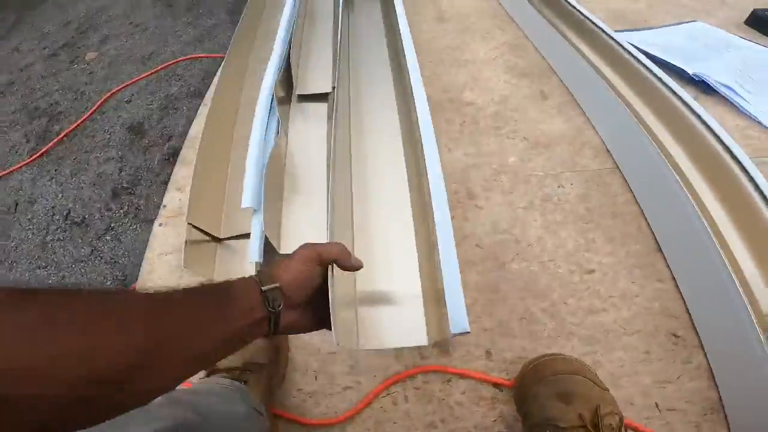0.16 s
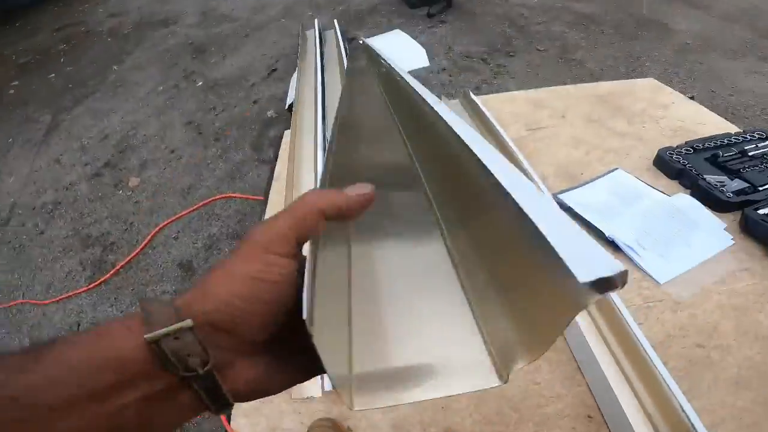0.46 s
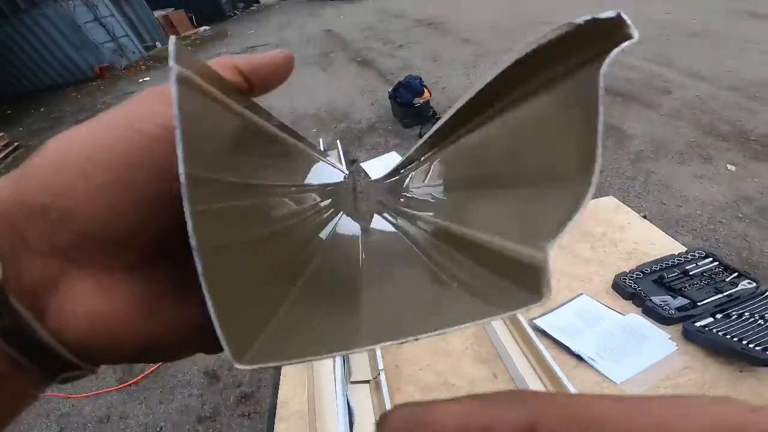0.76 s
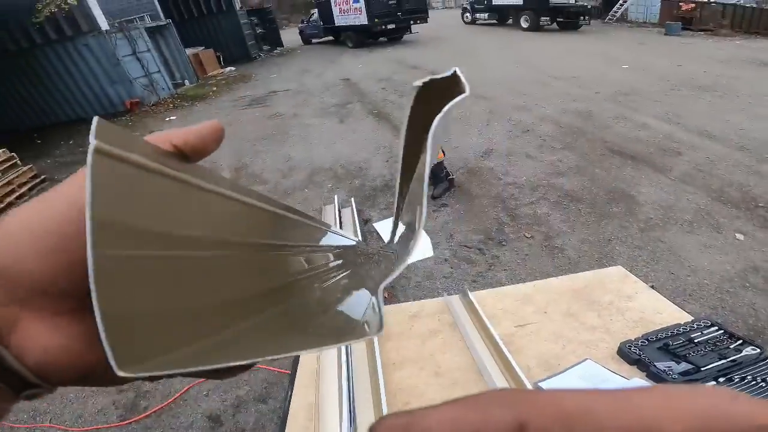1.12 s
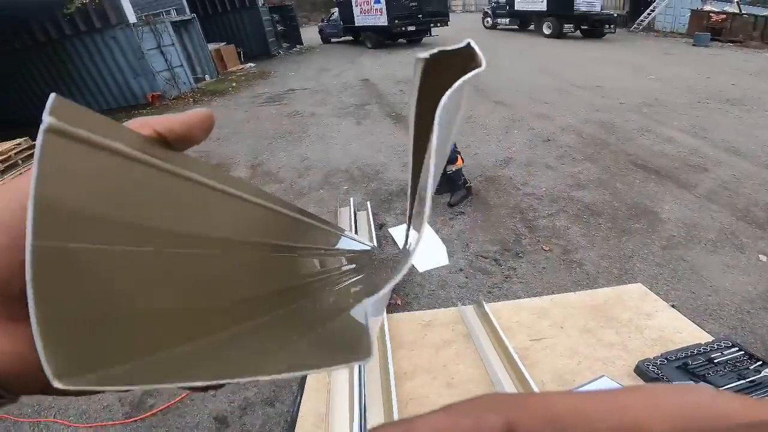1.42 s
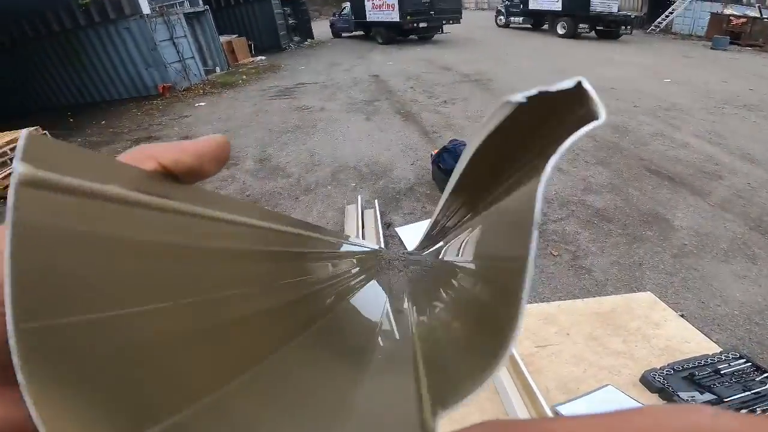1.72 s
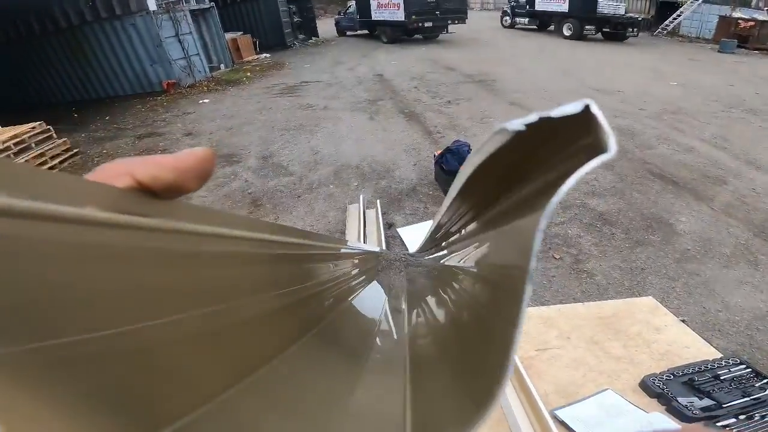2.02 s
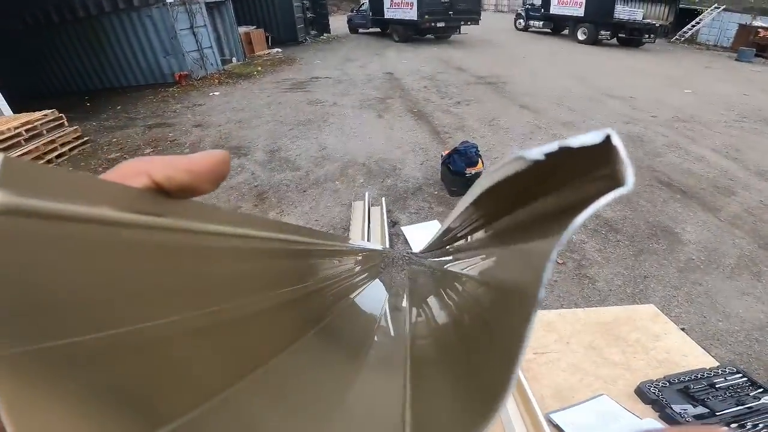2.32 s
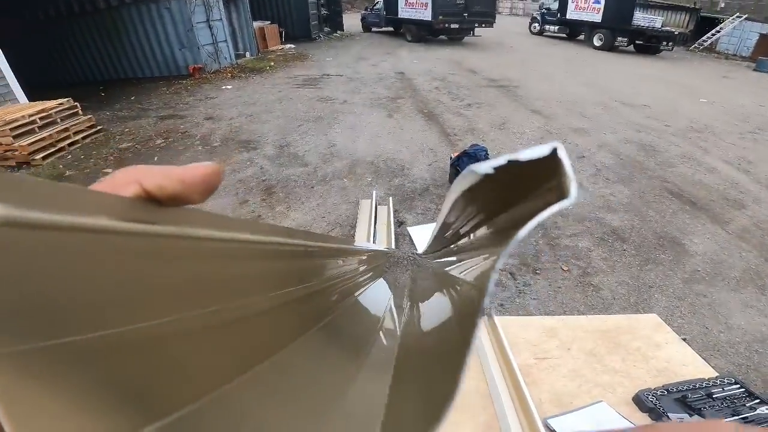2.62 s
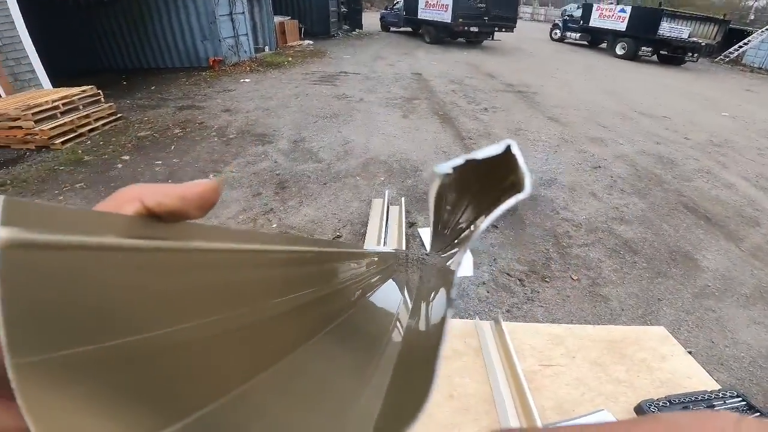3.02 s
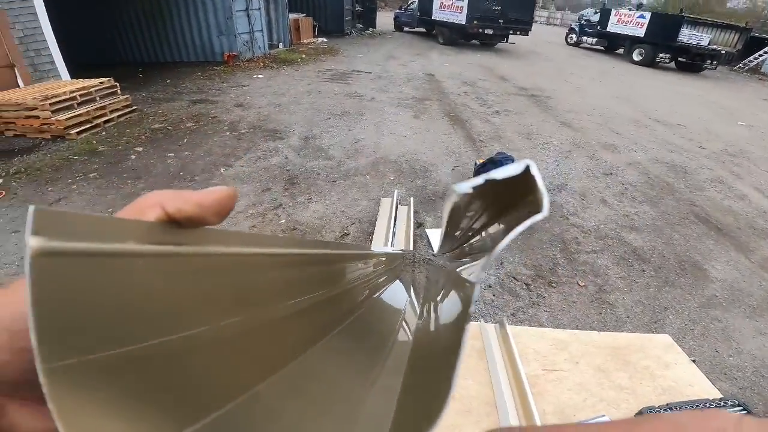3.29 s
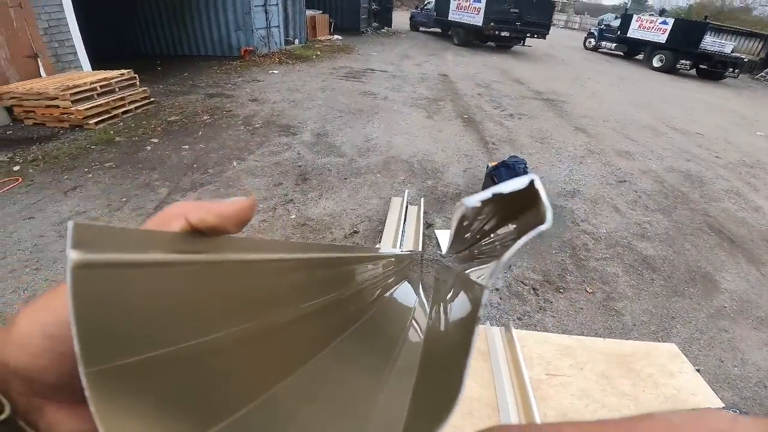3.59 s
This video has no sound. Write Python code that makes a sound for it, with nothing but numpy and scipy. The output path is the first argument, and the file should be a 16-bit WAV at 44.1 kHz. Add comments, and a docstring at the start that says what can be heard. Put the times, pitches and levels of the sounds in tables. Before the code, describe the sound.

A thin sheet-metal gutter gives dull knocks at about 0.1 s, then knocks, scrapes and squeals briefly off a board from 0.3 to 0.55 s. At 0.6-1.1 s it booms and rattles with fine metallic rasping and a cluster of sharp, pinging ticks. Fainter scattered clicks and tiny creaks continue, clearer near 1.6, 3.0, 3.2 and 3.6 s, with a soft knock at 3.5 s. Close, dry outdoor pickup; lumpy low wind, strongest early, over faint yard wash.

```python
"""Under a rumble of wind, dull knocks sound as a length of thin sheet-metal gutter bumps wood or hand.
Its edge scrapes and squeals off a plywood board by stick-slip, and its panels rattle and boom as it lifts.
Then it ticks as it flexes in the hand: dispersion turns each snap into a falling chirp, and the lip pings.
Random slips and blows drive the metal's responses; the wind and the faint open yard are coloured noise."""
import sys
import numpy as np
from scipy import signal
from scipy.fft import rfft, irfft, next_fast_len
from scipy.io import wavfile

SR = 44100
rng = np.random.default_rng(int(sys.argv[2]) if len(sys.argv) > 2 else 0)


def wav_out(sig):
    """Save sig, one row per channel (or a flat mono array), as 16-bit PCM at SR to the path in sys.argv[1]."""
    wavfile.write(sys.argv[1], SR, np.round(np.clip(np.atleast_2d(sig).T, -1, 1) * 32767).astype(np.int16))


N = 165375
T = np.arange(N) / SR
RING_T = T[:SR]   # one second, the length of every response

# The lip's resonance rises as it leaves the board. Each row: time in seconds, pitch in Hz.
LIP_PITCH = [(.28, 3880), (.5, 4020), (.64, 4210)]


def from_db(db):
    """Decibels to amplitude gain, by the logarithmic definition of level."""
    return 10 ** (np.asarray(db) / 20)


def rms_one(x):
    """Normalise to unit root-mean-square amplitude."""
    return x / np.sqrt(np.mean(x ** 2) + 1e-20)


def unit_energy(x):
    """Normalise an impulse response to unit energy."""
    return rms_one(x) / np.sqrt(x.shape[-1])


def decay(t60):
    """Exponential decay: the level falls by 60 dB in t60 seconds."""
    return np.exp(-np.log(1000) * RING_T / t60)


def level(rows, outside=None):
    """Envelope interpolated linearly in decibels between (s, dB) rows."""
    s, db = np.transpose(rows)
    return from_db(np.interp(T, s, db, left=outside, right=outside))


def colour(x, points):
    """Minimum-phase filtering: the (Hz, dB) shape fixes the phase through the Hilbert transform."""
    size = next_fast_len(x.shape[-1] + SR // 8)
    hz, db = np.transpose(points)
    f = np.maximum(np.abs(np.fft.fftfreq(size, 1 / SR)), 1)
    log_gain = np.log(from_db(np.interp(np.log(f), np.log(hz), db)))
    response = np.exp(np.conj(signal.hilbert(log_gain)))[:size // 2 + 1]
    return irfft(rfft(x, size) * response, size)[..., :x.shape[-1]]


def stereo_noise(size, side_db):
    """Partly correlated white noise: a shared mid signal and an opposed side signal."""
    mid, side = rng.standard_normal((2, size))
    return mid + from_db(side_db) * side * np.array([[1], [-1]])


def drift(rate):
    """Slow random wander of unit rms, with `rate` random knots per second."""
    knots = rng.standard_normal(N // 100)
    return rms_one(np.interp(T * rate, np.arange(len(knots)), knots))


def play(force, response):
    """Linear superposition: a force convolved with a body's impulse response."""
    return signal.fftconvolve(np.atleast_2d(force), response, axes=-1)[:, :N]


def blows(s, db):
    """Impulsive excitation: one single-sample force for each blow."""
    return np.bincount((np.asarray(s) * SR).astype(int), from_db(db), N)[:N]


def slips(per_s, spread_db):
    """Stick-slip friction: randomly timed impulses of uneven size and either sign."""
    excess_db = spread_db * np.minimum(rng.exponential(1, N), 4)
    sizes = from_db(excess_db) * rng.choice([-1, 1], N)
    return sizes * (rng.random(N) < per_s / SR)


def chirps(paths):
    """Dispersion of bending waves: the treble travels faster than the bass."""
    top_hz = 16000
    f = np.fft.rfftfreq(SR, 1 / SR)
    out = 0
    for delay, lag, db in paths:
        # the derivative of this phase is an arrival time that varies as 1 / sqrt(f)
        cycles = f * (abs(delay) + 1 / 2 ** 11) + lag * (2 * np.sqrt(f * top_hz) - f)
        out = out + from_db(db) * np.exp(-2j * np.pi * cycles)
    band_limited = out * np.exp(-(f / top_hz) ** 20)
    return unit_energy(irfft(band_limited, SR) * np.exp(-10 * RING_T))


def dense_ring(t60, side_db):
    """High modal density: modes merge into noise whose bands die sooner toward the treble."""
    tail_slope = 0.48   # t60 holds at 4 kHz and varies as frequency to the minus this power
    edges = np.geomspace(60, 20000, 13)
    noise = rfft(stereo_noise(SR, side_db))
    f = np.fft.rfftfreq(SR, 1 / SR)
    out = 0
    for low, high in zip(edges, edges[1:]):
        life = t60 * (4000 / np.sqrt(low * high)) ** tail_slope
        band = irfft(noise * ((f >= low) & (f < high)), SR)
        out = out + band * decay(life) / np.sqrt(life)
    return unit_energy(out)


def sheet_ring():
    """Modal superposition: long modes among faint ones, each a little louder on one side."""
    # Long ringing modes of the free sheet.
    # Each row: frequency in Hz, relative level in dB before scatter, t60 in seconds.
    sheet_modes = [(308, -8, .3), (436, -11, .45), (578, -9, .6), (868, -13, .5), (906, -11.5, 1.5),
                   (958, -14, .9), (1066, -14, .7), (1200, -1, .22), (1343, -14, .35), (1750, -9, .3),
                   (1820, -14, .4), (2056, -15, .6), (2960, -8, .25)]
    faint = [(hz, -19, .55) for hz in rng.uniform(450, 3200, size=40)]
    out = 0
    for hz, db, t60 in [*sheet_modes, *faint]:
        gain = from_db(db + rng.normal(0, 1, (2, 1))) * rng.choice([-1, 1])
        out = out + gain * np.sin(2 * np.pi * hz * RING_T) * decay(t60)
    return unit_energy(out)


def gutter(shape, tail_db, modes_db, side_db, t60, grip_t60=np.inf, paths=None):
    """Impulse response at one contact: dispersed chirps, dense ringing and long modes."""
    # Bending waves arrive by several paths.
    # Each row: delay in seconds, lag of 4 kHz behind the top in seconds, relative level in dB.
    sheet_paths = [(0, .003, -6), (0, .008, 0)]
    chirp = chirps(sheet_paths if paths is None else paths)
    body = colour(chirp + from_db(tail_db) * dense_ring(t60, side_db), shape)
    modes = unit_energy(sheet_ring() * decay(grip_t60))
    return unit_energy(body) + from_db(modes_db) * modes


def ticks():
    """Snap excitation: each snap stirs sheet and lip, some the lower body more than others."""
    # Sharp ticks. Each row: ping time in seconds, relative snap drive in dB,
    # relative ping level in dB, drive of the body against the snap in dB.
    tick_rows = [(0.6204, -11.5, -17.5, 9), (0.6828, -23, -17.5, 25.5), (0.696, -45, -20.5, 6),
                 (0.717, -13.5, -21, 18), (0.7563, -33.5, -18, -14), (0.7821, -12, -17.5, 14.5),
                 (0.8027, -22, -19.5, 8), (0.825, -11, -28.5, 8.5), (0.8942, -41, -17, -2),
                 (0.961, -15.5, -16, 8), (1.01, -21.5, -20.5, 8), (1.0851, -24, -27, 15),
                 (1.2379, -17.5, -22.5, 3.5), (1.4732, -36.5, -39, 11), (1.5726, -33, -39, 4),
                 (1.6101, -22, -27, 5), (1.749, -37.5, -50, 14), (1.7685, -30, -28, 17),
                 (2.1313, -31.5, -38.5, 2), (2.174, -35, -42, 9.5), (2.264, -45, -51, 18.5),
                 (2.367, -41, -46.5, 18), (3.017, -24.5, -28.5, 11.5), (3.1713, -24, -27.5, 12),
                 (3.6065, -25.5, -35, 14.5)]
    # Spectrum of the snapping sheet. Each row: frequency in Hz, relative level in dB.
    tick_colour = [(200, -12.5), (600, -20.5), (1700, -6), (2450, -11), (3000, -1.5), (4400, -5),
                   (5200, -0.5), (7000, 1), (8200, -6.5), (9700, -3.5), (11500, -14), (15500, -25)]
    lead_s, body_edge_hz = .0015, 2610   # the blow precedes its ping; the body lies below the edge
    s, snap_db, ping_db, body_db = np.transpose(tick_rows)
    # the hand damps the long modes
    response = gutter(tick_colour, tail_db=-2.5, modes_db=-12, side_db=-5, t60=0.29, grip_t60=1)
    lowpass = signal.butter(3, body_edge_hz, fs=SR, output="sos")
    body = signal.sosfiltfilt(lowpass, response, padtype=None)
    upper_snaps = play(blows(s - lead_s, snap_db), response - body)
    body_snaps = play(blows(s - lead_s, snap_db + body_db), body)
    pings = sum(from_db(db) * ping(at) for at, db in zip(s, ping_db))
    return from_db(15) * (upper_snaps + body_snaps) + from_db([[6], [4]]) * pings


def ping(s):
    """Beating of close modes: the lip sings briefly, then a weak reflection and a fluttering tail."""
    # Close modes of the folded lip. Each row: frequency in Hz before scatter, relative level in dB.
    lip_modes = [(3835, -16), (4185, -2.5), (4410, -8)]
    attack_s, burst_s = 0.00051, 0.0088
    echo_s, echo_db = .0185 * rng.uniform(1, 1.6), -12.5
    tail_db, tail_t60_s, flutter_per_s = -10.5, 0.26, 170
    bend = 1 + 0.01214 * rng.standard_normal()   # the pitch scatters from tick to tick

    def burst(t):
        """Quick exponential onset under a flat-topped window."""
        t = np.maximum(t, 0)
        return (1 - np.exp(-t / attack_s)) * np.exp(-(t / burst_s) ** 4)

    tail = from_db(tail_db) * decay(tail_t60_s)
    onset = burst(RING_T) + from_db(echo_db) * burst(RING_T - echo_s)
    out = 0
    for hz, db in lip_modes:
        flutter = np.array([drift(flutter_per_s)[:SR] for side in "LR"])
        tone = np.sin(2 * np.pi * hz * bend * RING_T)
        out = out + from_db(db) * (onset + tail * flutter) * tone
    return np.pad(out, ((0, 0), (int(s * SR), N)))[:, :N]


def knocks():
    """Impact spectrum: a softer contact with wood or hand lasts longer and is duller."""
    # Dull knocks. Each row: time in seconds, relative drive in dB, upper edge in Hz.
    knock_rows = [(.104, -16.5, 9000), (0.125, -16.5, 3520), (.331, -13.5, 2500), (0.444, -10.5, 4020),
                  (3.517, -19, 680)]
    # Spectrum of the knocked gutter. Each row: frequency in Hz, relative level in dB.
    knock_colour = [(80, -21.5), (270, 2), (1200, 2.5), (2250, -9), (7000, -18), (15000, -67.5)]
    force = 0
    for s, db, edge_hz in knock_rows:
        softness = signal.butter(1, edge_hz, fs=SR, output="sos")
        force = force + signal.sosfilt(softness, blows([s], [db]) + 1e-18)
    response = gutter(knock_colour, tail_db=7, modes_db=-6, side_db=-11, t60=0.1,
                      paths=[(0, .001, 0)])
    return from_db(21.5) * play(force, response)


def slide(force, contact, count=6):
    """Position-dependent excitation: the contact hops between places, each with its own ring."""
    shifts_per_s = 35   # knots per second in the wander that chooses the place
    place = np.argmax([drift(shifts_per_s) for k in range(count)], axis=0)
    return sum(play(force * (place == k), unit_energy(contact())) for k in range(count))


def drag():
    """Stick-slip friction: the edge stutters over the board."""
    # Pressure of the edge on wood. Each row: time in seconds, relative drive in dB.
    pressure = [(.125, -17.5), (.17, -30.5), (.25, -37), (.29, -19.5), (.345, -18), (.39, -19.5),
                (.455, -21), (.53, -20.5), (.73, -25.5), (.85, -24), (.99, -28), (1.15, -45)]
    # Spectrum of the scrape. Each row: frequency in Hz, relative level in dB.
    drag_colour = [(120, -22.5), (290, 2.5), (380, -8), (580, 1.5), (1020, -5.5), (1190, 7.5),
                   (1450, -10.5), (1750, 1), (2250, -18), (2750, -10), (4700, -17.5), (15000, -53.5)]
    contact = lambda: gutter(drag_colour, tail_db=-1, modes_db=-5.5, side_db=-10, t60=0.091)
    force = rms_one(slips(per_s=2000, spread_db=3) * from_db(2.2 * drift(80)))
    return from_db(-0.5) * slide(force * level(pressure, -120), contact)


def lip(x):
    """Time-varying resonance: shifting down, smoothing and shifting back follows the lip's pitch."""
    width_hz, peak_db = 300, 20
    turn = np.exp(2j * np.pi * np.cumsum(np.interp(T, *np.transpose(LIP_PITCH))) / SR)
    r = np.exp(-np.pi * width_hz / SR)
    smoothed = signal.lfilter([1 - r], [1, -r], x / turn + 1e-18)
    return x + from_db(peak_db) * 2 * np.real(turn * smoothed)


def rasp():
    """Friction of metal on metal: fine slips grate during the lift and creak in the grip."""
    # Fine rasp. Each row: time in seconds, relative drive in dB.
    rasp_rows = [(.11, -50), (.21, -54), (.265, -41), (.3, -36), (.375, -39), (.415, -32.5), (.48, -39),
                 (.54, -34.5), (.61, -44), (.635, -32.5), (.82, -35), (.885, -39), (.975, -35),
                 (1.06, -52.5), (1.2, -61)]
    # Creaks and rustles in the grip, from brief to drawn out.
    # Each row: centre in seconds, half-width to 1/e in seconds, relative drive in dB.
    creak_rows = [(.01, 0.16, -61), (1.76, 0.023, -44), (1.387, 0.59, -65), (2.394, 0.2, -64.5),
                  (2.683, 0.022, -51), (2.984, 0.18, -64.5), (3.547, 0.04, -55.5)]
    # Spectrum of the rasp. Each row: frequency in Hz, relative level in dB.
    rasp_colour = [(1500, -38), (2800, 1), (5000, -0.5), (7000, 4.5), (8200, -0.5), (9500, -1),
                   (12000, -8.5), (15500, -36)]
    contact = lambda: gutter(rasp_colour, tail_db=3, modes_db=-30, side_db=-9, t60=.07)
    grip = sum(from_db(db) * np.exp(-((T - s) / length) ** 2) for s, length, db in creak_rows)
    uneven_slips = slips(per_s=1500, spread_db=4) * from_db(2.5 * drift(80))
    grating = rms_one(uneven_slips) * level(rasp_rows, -120)
    creaking = rms_one(slips(per_s=310, spread_db=5)) * grip
    return slide(lip(from_db(2.0) * grating + from_db(-2) * creaking), contact)


def sing(hz, waver_hz):
    """Self-sustained resonance under uneven slips: pitch and strength waver."""
    tone = np.sin(2 * np.pi * np.cumsum(hz + waver_hz * drift(200)) / SR)
    return rms_one(tone * from_db(2 * drift(200)))


def squeals():
    """Friction-driven oscillation: the lip squeals on each skid, higher as it leaves the board."""
    # Skids of the edge. Each row: centre in seconds, level in dB.
    skids = [(0.291, -25.5), (.342, -23.5), (0.411, -27), (0.451, -26), (0.501, -24), (.535, -26)]
    skid_s, waver_hz = 0.016, 91.5   # half-width to 1/e; rms waver of pitch
    grip = sum(from_db(db) * np.exp(-((T - s) / skid_s) ** 2) for s, db in skids)
    return grip * sing(np.interp(T, *np.transpose(LIP_PITCH)), waver_hz)


def panels():
    """Selective excitation of modes: as the contact shifts, one panel after another swells."""
    # Panels caught by a contact.
    # Each row: centre in seconds, half-width to 1/e in seconds, mean pitch in Hz, level in dB.
    panel_rings = [(0.357, 0.015, 1194, -20.5), (0.455, 0.015, 1188, -18.5), (0.413, 0.081, 2615, -30),
                   (.673, 0.011, 250, -19), (.732, 0.019, 564, -18), (0.837, 0.014, 571.4, -25.5),
                   (0.971, 0.15, 566.6, -33)]
    waver = 0.025   # rms share of the pitch, as the sheet bends
    out = 0
    for s, length, hz, db in panel_rings:
        swell = from_db(db) * np.exp(-((T - s) / length) ** 2)
        out = out + swell * sing(hz, waver * hz)
    return out


def boom():
    """Low-frequency plate radiation: the wide panels shudder as they leave the board."""
    # Flexing of the sheet. Each row: time in seconds, relative drive in dB.
    flex = [(0.1, -24), (.32, -37.5), (0.6, -49), (0.664, -24.5), (1.1, -50.5)]
    # Spectrum of the boom. Each row: frequency in Hz, relative level in dB.
    flex_colour = [(60, -33), (120, 18), (270, 6.5), (440, 10), (700, 9.5), (2000, -31.5)]
    response = unit_energy(colour(dense_ring(t60=0.029, side_db=-13.5), flex_colour))
    return play(rms_one(slips(per_s=330, spread_db=1.0)) * level(flex, -120), response)


def outdoors():
    """Turbulence and diffuse sound: lumpy wind on the microphone over the distant wash of the yard."""
    # Strength of the wind. Each row: time in seconds, relative level in dB.
    wind_rows = [(0, -31), (.26, -37), (.345, -18), (.39, -30), (.7, -25), (.95, -27.5), (1.1, -41),
                 (1.45, -48.5), (1.63, -38.5), (1.85, -47.5), (2.3, -37.5), (2.8, -44.5), (3.45, -44),
                 (3.75, -34)]
    # Spectrum of the wind. Each row: frequency in Hz, relative level in dB.
    wind_colour = [(20, 0), (60, -2), (110, -5), (160, -11), (300, -24), (1000, -32.5), (4000, -113)]
    # Strength of the yard noise. Each row: time in seconds, relative level in dB.
    yard_rows = [(0, -54), (1.3, -63), (3.5, -57), (3.75, -57)]
    # Spectrum of the yard noise. Each row: frequency in Hz, relative level in dB.
    yard_colour = [(59, -46), (100, 2), (620, -11.5), (960, -9), (3530, -31.5), (10100, -44), (12400, -55),
                   (15000, -107)]
    rumble = colour(stereo_noise(N, side_db=-9), [(4, -30), *wind_colour])
    wind = rms_one(rumble * from_db(1.5 * drift(18)))
    yard = rms_one(colour(stereo_noise(N, side_db=-10), [(30, 2.8), *yard_colour]))
    return from_db([[-.5], [.5]]) * wind * level(wind_rows) + from_db(13.0) * yard * level(yard_rows)


def scene():
    """Interaural delay: the gutter's sound reaches the right port a moment before the left."""
    ear_lag_s = .00001
    left, right = ticks() + knocks() + drag() + rasp() + squeals() + panels() + boom()
    lag = np.exp(-2j * np.pi * np.fft.rfftfreq(2 * N, 1 / SR) * ear_lag_s)
    left = irfft(rfft(left, 2 * N) * lag)[:N]
    return np.array([left, right]) + outdoors()


def record(dry):
    """Band limitation: a steep low-pass takes off 70 dB from 16.1 kHz upward."""
    return signal.sosfilt(signal.cheby2(16, 70, 16100, fs=SR, output="sos"), dry)


dry = scene()
out = record(dry)
wav_out(out)
```